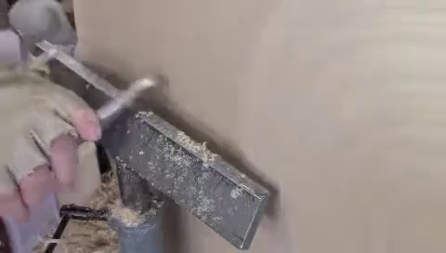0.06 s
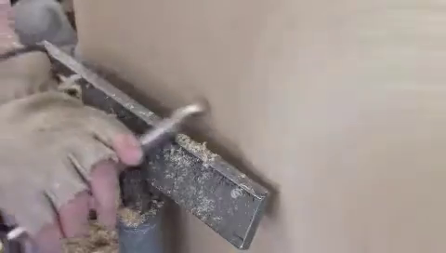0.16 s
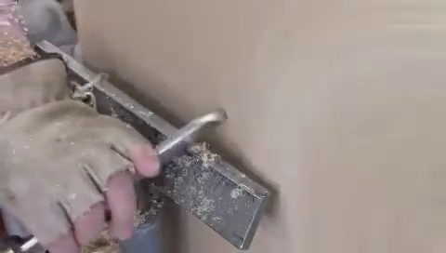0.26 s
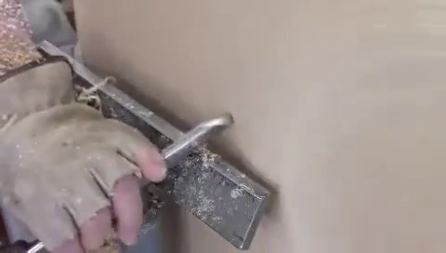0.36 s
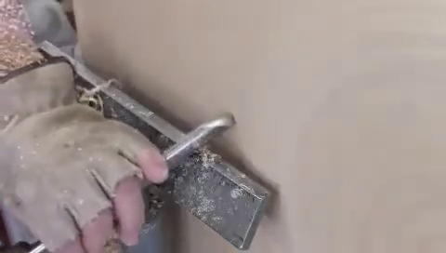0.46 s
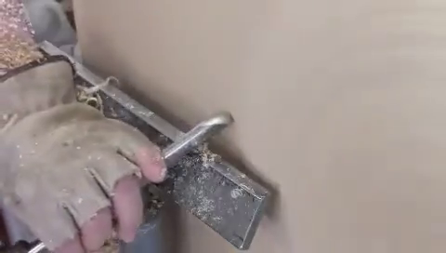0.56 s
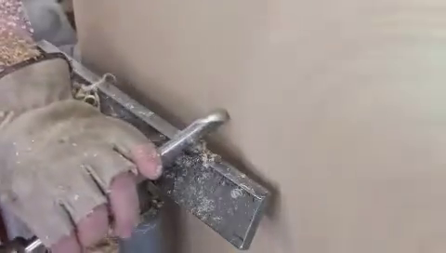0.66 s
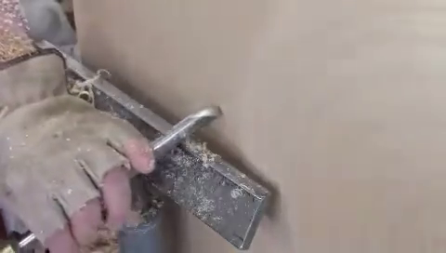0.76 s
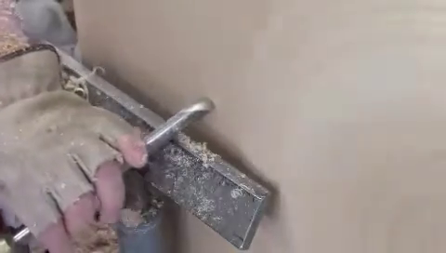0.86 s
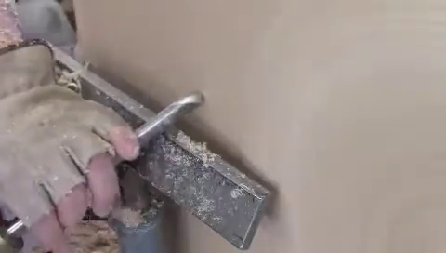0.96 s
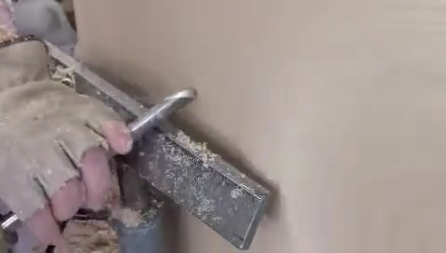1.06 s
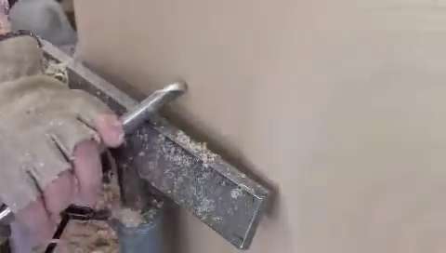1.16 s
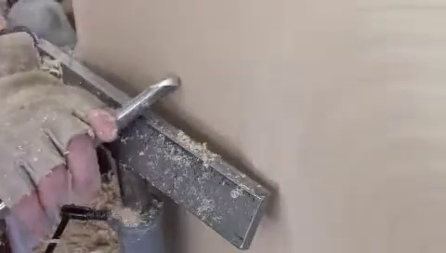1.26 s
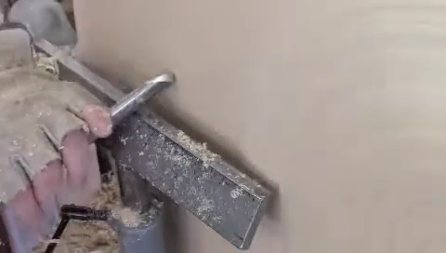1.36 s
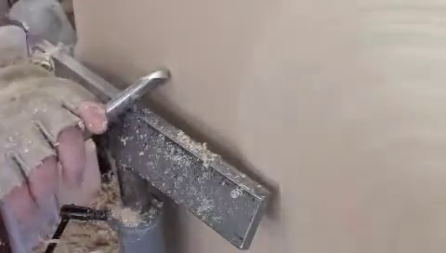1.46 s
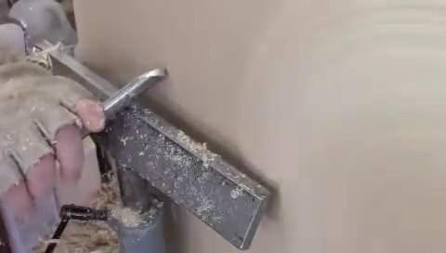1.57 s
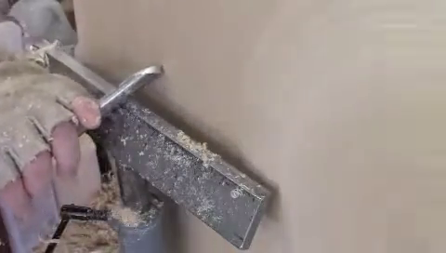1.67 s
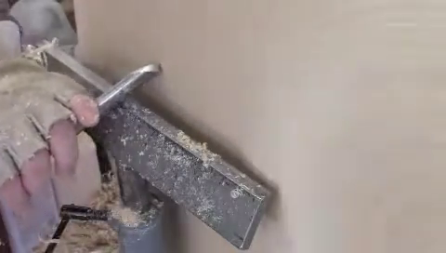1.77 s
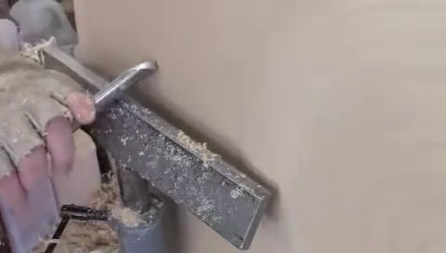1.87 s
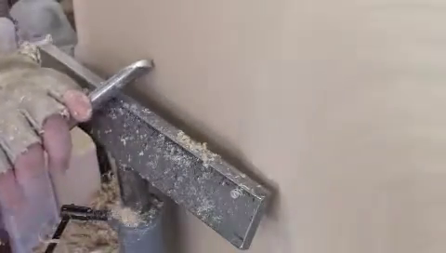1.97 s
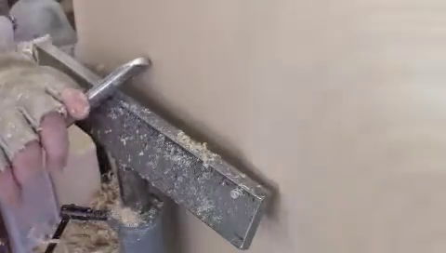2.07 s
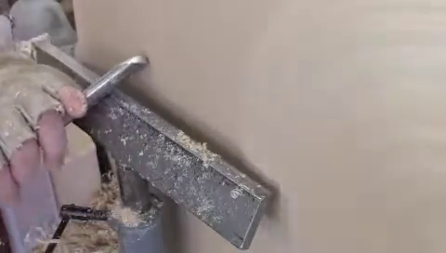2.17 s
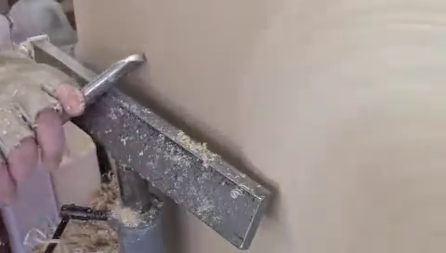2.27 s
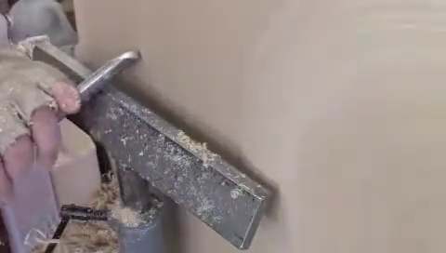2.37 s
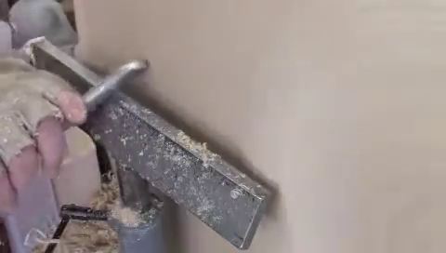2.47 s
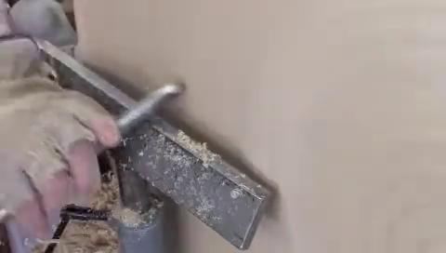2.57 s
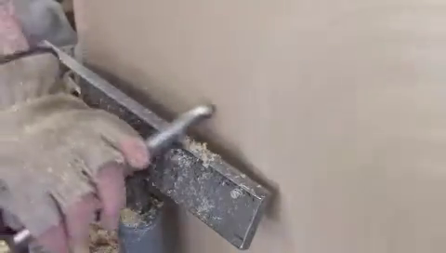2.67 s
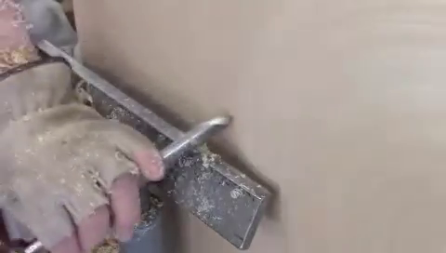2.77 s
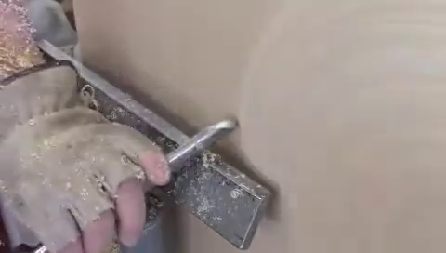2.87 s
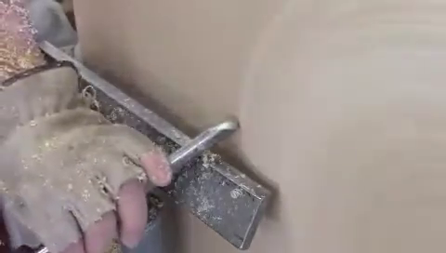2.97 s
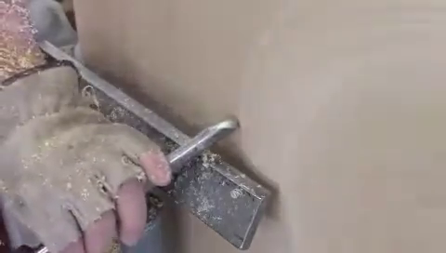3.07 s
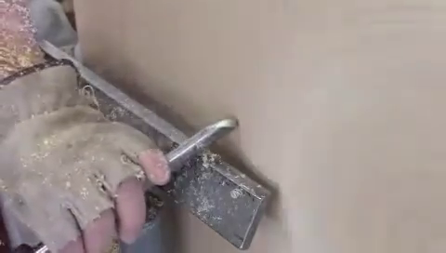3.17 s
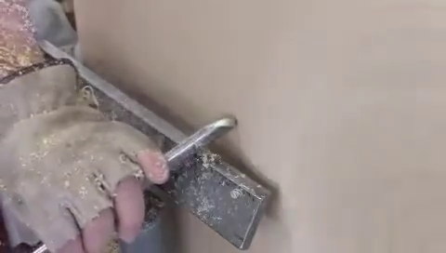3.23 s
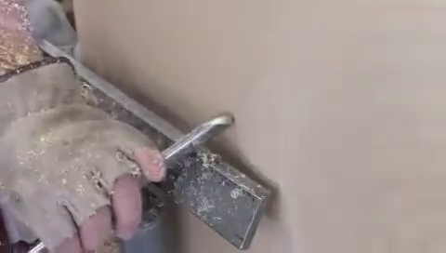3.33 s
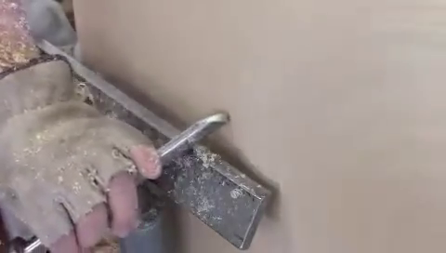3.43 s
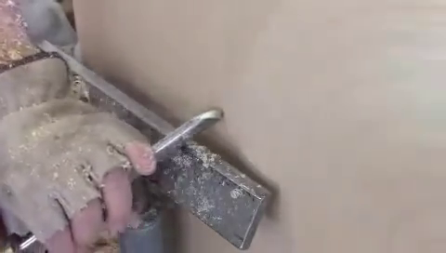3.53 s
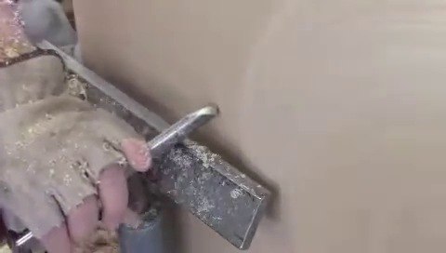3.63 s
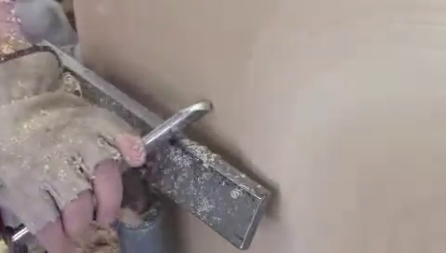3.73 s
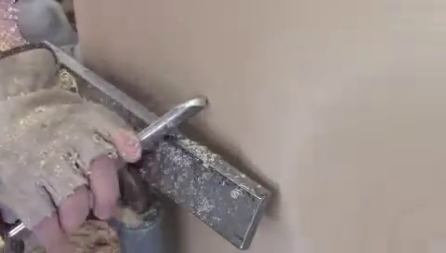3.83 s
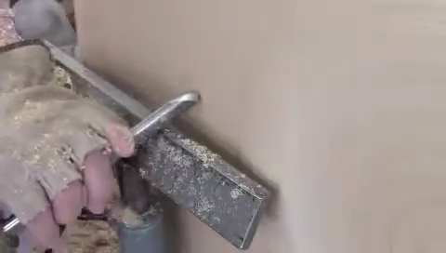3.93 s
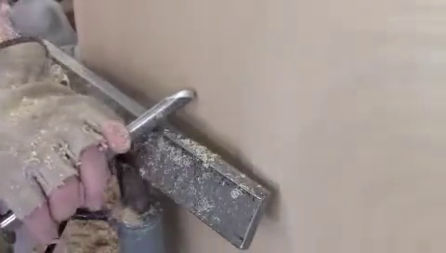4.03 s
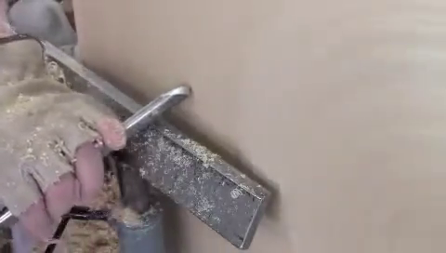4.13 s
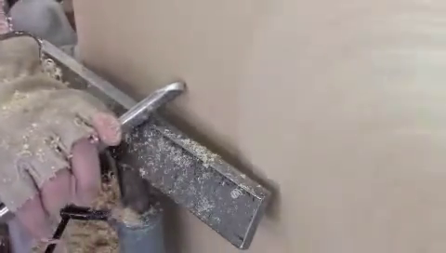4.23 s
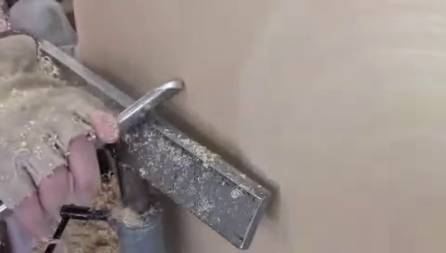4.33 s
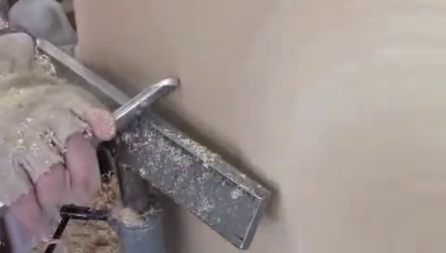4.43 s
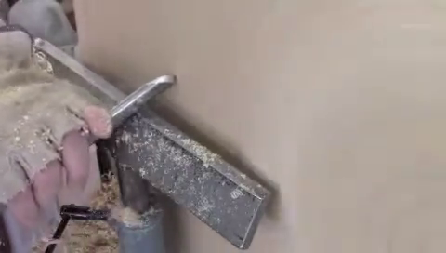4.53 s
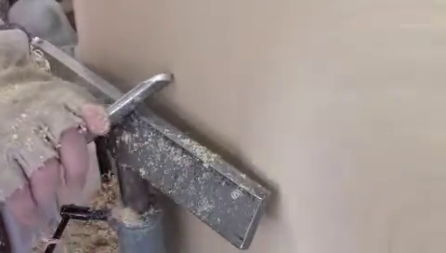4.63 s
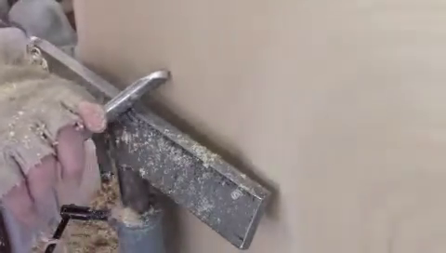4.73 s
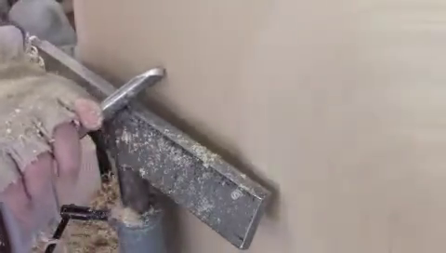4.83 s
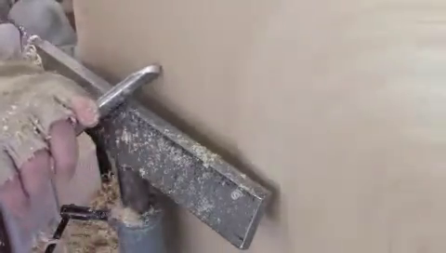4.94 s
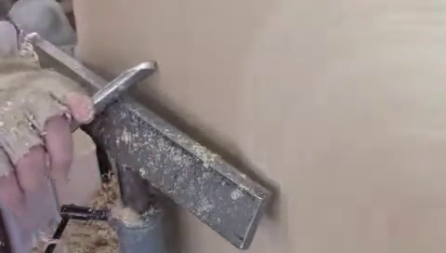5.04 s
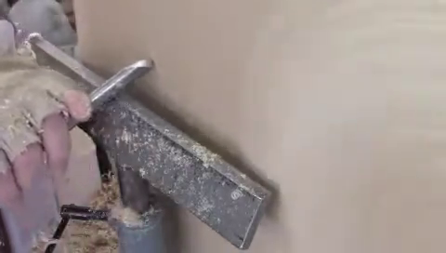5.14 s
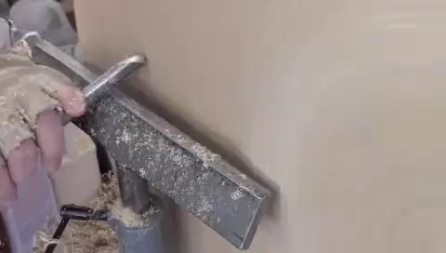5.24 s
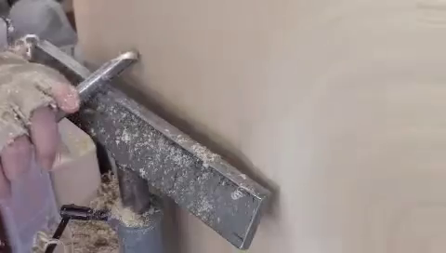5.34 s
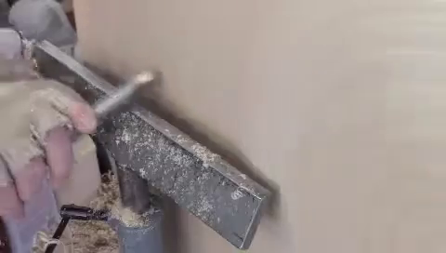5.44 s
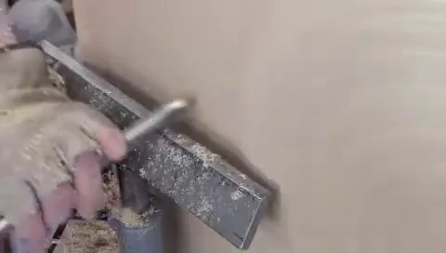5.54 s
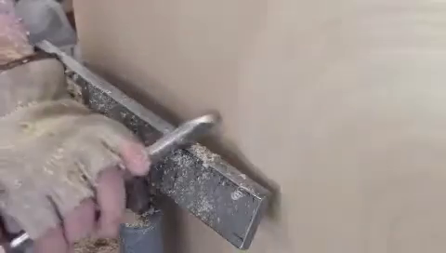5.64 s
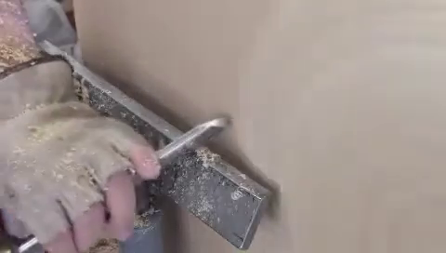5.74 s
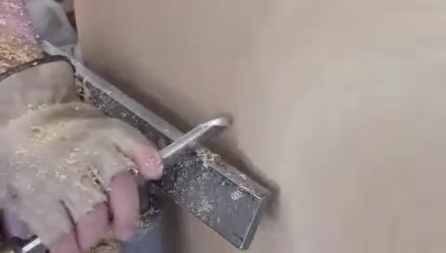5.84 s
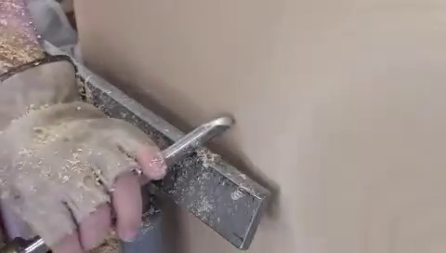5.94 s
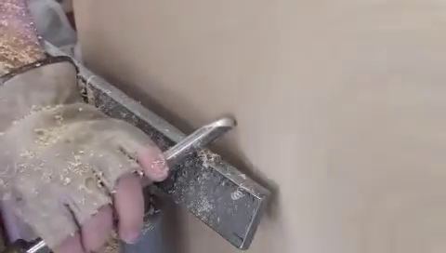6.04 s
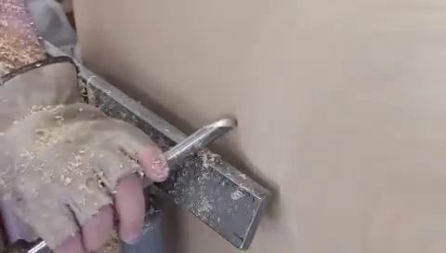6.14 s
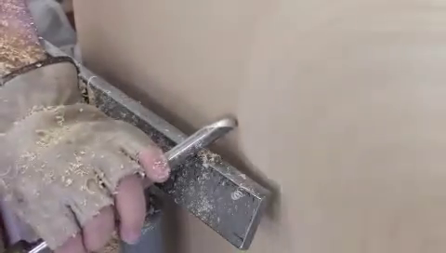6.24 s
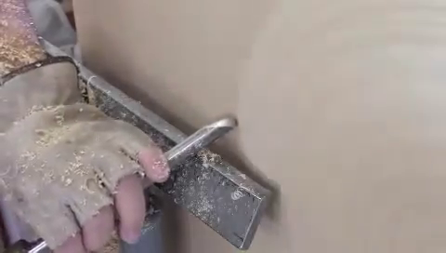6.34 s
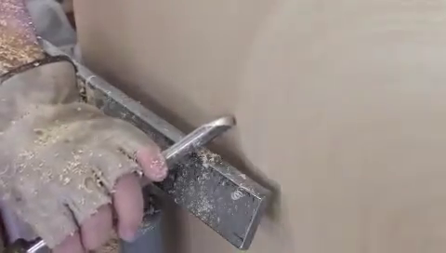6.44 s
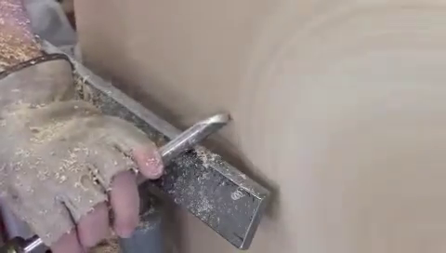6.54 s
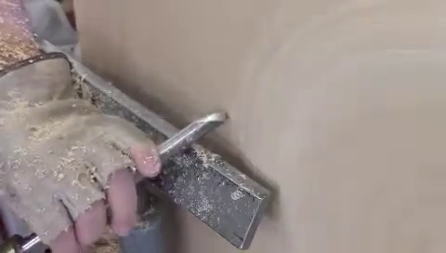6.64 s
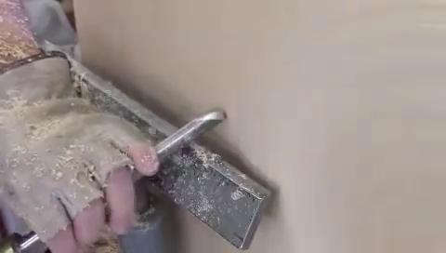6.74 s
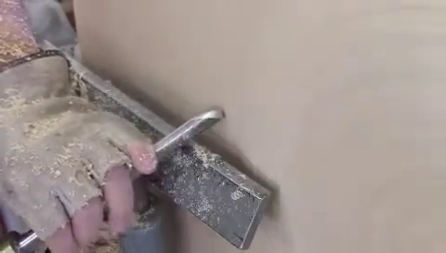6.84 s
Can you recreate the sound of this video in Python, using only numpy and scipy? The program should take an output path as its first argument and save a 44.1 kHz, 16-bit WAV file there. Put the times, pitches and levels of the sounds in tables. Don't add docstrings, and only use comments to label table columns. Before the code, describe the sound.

A close, thin-sounding microphone in a small workshop. At 0 s a cut is just ending; quiet airy lathe noise and faint motor hum remain, with a slight steel scrape and a small knock near 0.2 s. From 0.3 s light dull touches patter, and by 0.6 s the gouge bites: a buzzing, reedy drone of several hundred hertz up to nearly two kilohertz, rippling about sixteen times a second, with tearing hiss and end-grain ticks about thirty times a second. It grows harsher from 1.3 s and stops near 2.5 s. After a brief scrape, the second pass enters around 2.7 s, louder and rougher from 3.3 s with hard crackling digs, ending at 5.4 s. A thin steel slide and quiet hum follow. Near 5.7 s the bevel rubs again; uneven touches from 5.95 s lead to a strong, rasping cut from 6.45 s that continues to the end, about 7 s.

```python
import sys
import numpy as np
from scipy import signal
from scipy.fft import rfft, irfft
from scipy.io import wavfile
from scipy.ndimage import uniform_filter1d

SR = 44100
rng = np.random.default_rng(int(sys.argv[2]) if len(sys.argv) > 2 else 0)


def log_audio(samples):
    frames = np.atleast_2d(samples).T
    limited = np.clip(frames, -1, 1)
    pcm = np.round(limited * 32767).astype(np.int16)
    wavfile.write(sys.argv[1], SR, pcm)


def undo_db(level):
    steps = np.asarray(level, float) / 20
    return 10 ** steps


N = 304290
T = np.arange(N) / SR

TURNS_PER_S = 15.69
SETTLE_S = 0.58
FIFTH_DB = -9
# t/s, lead over steady speed/turns
SPINDLE_LEAD = [(0, .004), (.45, .0225), (.8, .0103), (1.5, -.0056), (2, -.0028), (2.95, .0277),
                (3.3, .0188), (4.9, .0202), (5.3, .0247), (5.9, .0526), (6.2, .0555), (6.9, .048)]
# t/s, tearing level/dB, usual end-grain catch level/dB
CUT_DEPTH = [(0, -38.5, -24), (.59, -36.5, -33), (.9, -35, -24), (1.35, -28.5, -15), (2.1, -26.5, -10),
             (2.2, -33.5, -20), (2.47, -33, -19), (2.7, -42.5, -21), (3.05, -34, -26), (3.3, -23, -12),
             (3.6, -29, -12.5), (4.4, -25, -15), (5.2, -31, -8), (5.36, -35.5, -21), (5.96, -32.5, -25),
             (6.26, -49, -22), (6.45, -28.5, -17), (6.9, -24, -12)]


def evened(x):
    return x / np.sqrt(np.mean(x ** 2) + 1e-20)


def curve(rows):
    s, *columns = np.transpose(rows)
    return [np.interp(T, s, c) for c in columns]


def coloured(x, points):
    f, db = np.transpose(points)
    hz = np.fft.rfftfreq(len(x), 1 / SR)
    gain_db = np.interp(np.log(hz + 1), np.log(f), db)
    return irfft(rfft(x) * undo_db(gain_db), len(x))


def resonated(x, peaks):
    hz = np.fft.rfftfreq(len(x), 1 / SR)
    response = sum(undo_db(db) / (1 + 2j * (hz - f) / w) ** 2 for f, w, db in peaks)
    return irfft(rfft(x) * response, len(x))


def drift(hz):
    knots = rng.standard_normal(int(N / SR * 40) + 2)
    smooth = signal.lfilter([1], [1, -np.exp(-2 * np.pi * hz / 40)], knots)
    return evened(np.interp(T * 40, np.arange(len(knots)), smooth))


def hand():
    # bevel lands t/s, edge first bites t/s, bevel lifts t/s
    passes = [
        (-5, -2.5, .04),
        (0.3036, .29, 2.515),
        (2.715, 2.5, 5.4),
        (5.67, 6, 7.5),
    ]
    land, bite, lift = np.transpose(passes)[:, :, None]
    landing_db = -32.5 * np.exp(np.minimum((land - T) / 0.058, 1))
    lifting_db = -150 * np.maximum(T - lift, 0)
    loss_db = np.minimum(landing_db, lifting_db)
    current = np.searchsorted(land[:, 0], T) - 1
    return loss_db.max(0), T - bite[current, 0]


def shop():
    # f/Hz, level per Hz/dB
    air_colour = [(35, -72), (60, -42), (81, -20), (185, -5.5), (521, 5), (3340, -3.5), (4980, -8.5),
                  (6450, -22), (6920, -10.5), (15400, -29), (16500, -43)]
    air = undo_db(-47) * evened(coloured(rng.standard_normal(N), air_colour))
    hum = evened(resonated(rng.standard_normal(N), [(92.7, 16, 0), (130, 80, -14)]))
    loss_db, since = hand()
    load_db = loss_db - 30 * np.clip(1 - since / SETTLE_S / 1.9, 0, 1)
    hum_db = -78 + 0.43 * load_db + 2.5 * drift(1.1) + 34.5
    return air + hum * undo_db(hum_db)


def around(rows, turns):
    once, at1, twice, at2 = np.transpose(rows)[:, :, None]
    return once * np.cos(2 * np.pi * (turns - at1)) + twice * np.cos(2 * 2 * np.pi * (turns - at2))


def bevel():
    # t/s, bevel pressure/dB, lean toward the low partials/dB
    pressure = [(0, -30, -0.5), (.43, -30.5, -7), (.8, -31.5, 1), (1.6, -25, -9), (2.12, -25.5, -10.5),
                (2.25, -28.5, -2), (2.86, -26, -2.5), (3.33, -21.5, -.5), (3.6, -25.5, -0.5),
                (4.4, -22.5, -5.5), (4.62, -24, -3.5), (4.72, -26.5, -6.5), (5.37, -27, -2.5),
                (5.84, -25, -4.5), (6.02, -21, -5.5), (6.26, -25.5, -10), (6.5, -18, -0.5),
                (6.9, -18.5, -1.5)]
    ridges = np.array([[23], [49], [73], [96], [119], [101]])
    # level over the pressure/dB, share of the lean, level gained on the inner ridges/dB,
    # share of the lean there, share of the loss at landing and lifting
    partials = [(-0.3, 1.06, 0.24, 0.97, 1.26), (-4.5, 0.5, 2.5, 0.33, 2.2), (-6, 0.5, 2.5, -0.24, 1.6),
                (-2.5, 0, 0.45, 0, 1.05), (FIFTH_DB - 2, 0, -0.59, 0, 0.77), (-11, -0.5, -2, 0, 0.9)]
    # once a turn/dB, at/turn, twice a turn/dB, at/turn
    outer_swell = [(2.2, 0.67, 1.7, 0.15), (1.2, 0.61, 2.3, 0.36), (2.8, 0.71, 5.3, 0.2),
                   (3.8, 0.53, 1.0, 0.2), (1.1, 0.74, 5.3, 0.35), (3.6, 0.46, 4.2, 0.19)]
    inner_swell = [(1.6, 0.96, 1.1, 0.12), (2.7, 0.7, 2.6, 0.29), (5.6, 0.4, 1.1, 0.2),
                   (3.6, 0.51, 0.4, 0.43), (2.8, 0.59, 3.4, 0.3), (3.2, 0.34, 3.1, 0.2)]
    outer_early = [(0.08, 0.14, 0.02, 0.1), (0.02, 0.01, 0.07, 0.21), (0.11, 0.39, 0.0, 0.38),
                   (0.14, 0.48, 0.1, 0.45), (0.03, 0.03, 0.05, 0.46), (0.17, 0.12, 0.05, 0.37)]
    inner_early = [(0.03, 0.15, 0.01, 0.39), (0.03, 0.83, 0.09, 0.22), (0.14, 0.04, 0.06, 0.43),
                   (0.16, 0.51, 0.1, 0.44), (0.06, 0.02, 0.04, 0.49), (0.16, 0.06, 0.1, 0.39)]
    # f/Hz, width/Hz, level/dB
    body = [(319.7, 52, -7), (527, 74, -1.5), (762, 59, 0), (929, 13, -14.5), (1105, 20, -26),
            (1158, 55, 2), (1434, 170, -5.5), (1547, 167, 2), (1905, 123, -2.5), (2259, 196, -5),
            (2582, 190, -9)]
    ripple_waves = np.array([16, 32, 34, 59, 68])
    ripple_levels = [-26, -18, -22.5, -22, -18.5]

    turns = TURNS_PER_S * T + curve(SPINDLE_LEAD)[0]
    loss_db, since = hand()
    inward = np.clip((since - SETTLE_S) / 0.41, 0, 1)
    outer_db, inner_swell_db = around(outer_swell, turns), around(inner_swell, turns)
    swell_db = outer_db + inward * (inner_swell_db - outer_db)
    outer_lead, inner_lead = around(outer_early, turns), around(inner_early, turns)
    ridge_lead = outer_lead + inward * (inner_lead - outer_lead)

    push_db, lean_db = curve(pressure)
    over_db, leans, inner_db, inner_leans, loses = np.transpose(partials)[:, :, None]
    level_db = push_db + over_db + (leans + inward * (inner_leans - leans)) * lean_db
    level_db = level_db + inner_db * inward + np.maximum(loses * loss_db, -37)

    waver = np.array([drift(3.5) for _ in ridges[1:]]) * np.array([[.2], [.5], [.8], [1.1], [1.3]])
    with_own = [0, 1, 2, 3, 4, 3]
    phase = ridges * turns + ridge_lead + 0.01 * waver[::-1][with_own] * ridges / 73
    phase[-1] += .53
    tone_db = level_db + 1.06 * swell_db + 1.3 * waver[with_own]
    tone = np.sqrt(2) * undo_db(tone_db) * np.cos(2 * np.pi * phase)

    per_turn = 2810
    renewed = .2
    fresh = rng.standard_normal((int(turns[-1]) + 22, per_turn))
    surface = signal.lfilter([1], [1, renewed - 1], fresh, axis=0)[20:].ravel()
    grain = resonated(np.interp(turns * per_turn, np.arange(len(surface)), surface), body)
    grain = evened(grain) * undo_db(-2 + .65 * swell_db[3])

    ripples = np.zeros(N)
    for waves, db in zip(ripple_waves, ripple_levels):
        ripples += undo_db(db + 3.25 * drift(3.6)) * np.cos(2 * np.pi * (waves * turns + rng.random()))

    bulge = np.exp(0.76 * (np.cos(2 * np.pi * (turns - .42)) - 1))
    puffs = evened(resonated(rng.standard_normal(N), [(4160, 2100, 0)])) * bulge * undo_db(-17.5)
    whistle = evened(resonated(rng.standard_normal(N), [(11850, 600, 0)])) * undo_db(-31)

    rub_db = 0.29 * level_db[0] + 0.62 * (push_db + loss_db)
    return tone.sum(0) + (grain + ripples * undo_db(0.5) + puffs + whistle) * undo_db(rub_db)


def engaged():
    # enters t/s, leaves t/s, faint brushing afterwards level/dB
    stays = [
        (-1, 0.0087, -69),
        (0.56, 2.475, -60),
        (2.67, 5.365, -60.5),
        (6, 5.995, -51.5),
        (6, 7.5, -60),
    ]
    enter, leave, idle_db = np.transpose(stays)[:, :, None]
    entering, staying = (T - enter) / 0.035, 1 - (T - leave) / 0.042
    share = np.clip(np.minimum(entering, staying), 0, 1).max(0)
    return share, idle_db[np.searchsorted(leave[:, 0], T) - 1, 0]


def catches():
    # t/s, peak
    # level/dB, length/ms
    single_catches = [(.001, -24, 5.9), (.2882, -25, 6.8), (.3182, -25, 7.3), (.3486, -32, 7.6), (.376, -32, 9),
                      (.4484, -30.5, 9), (.48, -32, 7.7), (.508, -38, 7.3), (.6325, -22, 5.5), (.8849, -17, 5),
                      (.9083, -13, 4.9), (1.0046, -15, 2.3), (1.1363, -10, 3), (2.68, -21, 7.9),
                      (2.7064, -24, 8.5), (2.7396, -21.5, 7.6), (2.798, -19, 6.1), (2.8624, -17, 6.6),
                      (5.637, -45, 3), (5.949, -14.5, 7.2), (5.9812, -14, 7.3), (6.025, -28, 7.4),
                      (6.2391, -17, 8.2), (6.277, -22, 6.7), (6.303, -16.5, 9.1), (6.3384, -18, 10.6),
                      (6.3693, -19, 10), (6.4022, -15.5, 11), (6.4895, -14, 13), (6.7105, -7, 6.7),
                      (1.3593, -4, 3.8), (1.4232, -2, 4.3), (1.5434, -5.5, 2.2), (1.577, -4, 2.3), (1.7664, -5, 3),
            (1.861, -5, 4), (2.0223, -2.5, 1.8), (2.0547, -6, 2.5), (2.088, 1.5, 1.1), (2.4417, -10.5, 2.2),
            (3.3338, -4.5, 4.9), (3.3625, -2, 5.2), (3.3947, 1, 4.3), (3.5224, -1.5, 4.7),
            (3.5856, -1.5, 4.2), (3.6494, -4, 3.6), (3.712, -4.5, 4.7), (3.8731, -5, 3.7), (3.904, 0, 3.2),
            (4.0961, -1, 2.1), (4.128, -2, 1.3), (4.3749, 3, 4.4), (4.4178, -4.5, 5.2), (4.575, -3.5, 5.4),
            (4.7355, -4, 2.5), (5.0856, -2.5, 1.2), (5.118, -3.5, 1.1), (5.271, -.5, 1.6),
            (6.5544, -4.5, 4.8), (6.5938, -6.5, 7.5)]
    half = np.arange(int(2 * TURNS_PER_S * T[-1]))
    luck = rng.standard_normal((len(half), 3))
    s = half / 2 / TURNS_PER_S
    narrow = np.clip(2 * np.interp(s, T, hand()[1]) / SETTLE_S - 1, 0, 1)
    at_turn = .46 + narrow * (.29 - .46) - np.interp(s, T, curve(SPINDLE_LEAD)[0])
    s = s + at_turn / TURNS_PER_S + 0.0033 * luck[:, 0]
    far_side_db = -6 * (1 - narrow) * (half % 2 == 0)
    db = np.interp(s, T, curve(CUT_DEPTH)[1]) + 5.5 * np.minimum(luck[:, 1], .7) + far_side_db
    ms = (8.1 + narrow * (2.9 - 8.1)) * np.exp(0.33 * luck[:, 2])
    placed = np.array(single_catches)
    clear = abs(s[:, None] - placed[:, 0]).min(1) > .016
    free = clear & (np.interp(s, T, engaged()[0]) == 1)
    return np.vstack([placed, np.transpose([s, db, ms])[free]])


def edge():
    # f/Hz, level per Hz/dB
    tear_colour = [(710, -27), (1200, -5), (1310, -5.5), (1530, -9), (1700, -20), (1860, -28),
                   (1990, -16.5), (2890, -12.5), (6290, -11.5), (8830, -15.5), (14600, -18), (16000, -19),
                   (16500, -71)]
    snaps = rng.standard_normal(N) * undo_db(1.6 * np.minimum(rng.exponential(1, N), 5))
    tear = coloured(snaps, tear_colour)
    tear = tear + resonated(tear, [(4140, 560, -14), (6410, 1650, -11.5)]) * undo_db(4.5 * drift(6.2))
    tear /= np.std(coloured(tear, [(4400, -80), (4500, 0), (15000, 0), (15100, -80)]))
    bright = coloured(tear, [(3000, -20.5), (15000, 6.5)])

    swells = np.zeros((2, N + 4000))
    for s, peak_db, ms in catches():
        ms = np.clip(ms, 1, 14)
        u = np.arange(4000) / SR / ((ms + 1.2) / 1000)
        sharp = np.clip(1.3 - 0.13 * ms, 0, 1)
        burst = np.exp(-2.5 * (u - .7) ** 2 * np.where(u < .7, 3.0, 1))
        trail = 0.18 * np.minimum(u, 1) * np.exp(-u / 4)
        swell = undo_db(peak_db - 7.5) * (burst + trail)
        at = max(int((s - .0012 - 0.00048 * max(ms - 3, 0)) * SR), 0)
        swells[:, at:at + 4000] += np.outer([1 - sharp, sharp], swell)

    share, idle_db = engaged()
    flutter_db = 2.77 * evened(uniform_filter1d(rng.standard_normal(N), 300))
    steady = undo_db(idle_db + share * (curve(CUT_DEPTH)[0] - idle_db) + flutter_db)
    return tear * np.sqrt(steady ** 2 + swells[0, :N] ** 2) + bright * swells[1, :N]


def rest():
    # t/s, level/dB
    slides = [
        [(.1, -76), (.19, -68), (.26, -76)],
        [(2.5, -61), (2.6, -72), (2.67, -86)],
        [(5.465, -70), (5.48, -62), (5.56, -67), (5.7, -76)],
    ]
    # f/Hz, width/Hz, level/dB
    rest_modes = [(3400, 250, -3), (6270, 550, -5)]
    # t/s, peak level/dB
    knocks = [
        (0.188, -24.5),
    ]
    # f/Hz, level/dB, t60/s
    shank_modes = [(2240, -24, 0.16), (3820, -4, 0.062), (6060, -16, 0.091), (6400, 4, 0.036),
                   (7090, -19, 0.051)]
    scrape = evened(resonated(rng.standard_normal(N) * undo_db(rng.exponential(1, N)), rest_modes))
    level = sum(np.interp(T, s, undo_db(db + 13.5), 0, 0) for s, db in map(np.transpose, slides))
    u = np.arange(6000) / SR
    ring = sum(undo_db(db - 60 * u / t60) * np.sin(2 * np.pi * hz * u) for hz, db, t60 in shank_modes)
    ring = ring * np.minimum(u / 0.0013, 1)
    blows = np.zeros(N)
    for s, db in knocks:
        blows[int(s * SR)] = undo_db(db - 7.5)
    return scrape * level + signal.oaconvolve(blows, ring)[:N]


def walls(x):
    t60 = .16
    u = np.arange(SR // 2) / SR
    tail = rng.standard_normal((2, len(u))) * undo_db(-60 * u / t60) * (u > .004)
    side = np.convolve(tail[1], [1.5, -3.5, 3.5, -1], "same")
    tail = tail[0] + 0.084 * np.outer([1, -1], side)
    return signal.oaconvolve(x[None], tail / np.linalg.norm(tail[0]), axes=1)[:, :N]


def scene():
    rub = bevel()
    tool = edge() + rest()
    return shop() + rub + tool + walls(undo_db(-13) * tool + undo_db(-20) * rub)


def roll_off(x):
    return signal.sosfilt(signal.butter(12, 17000, fs=SR, output="sos"), x)


def record(dry):
    soft = np.tanh(dry / .9) * .9
    bass_cut = signal.butter(5, 235, "high", fs=SR, output="sos")
    thin = signal.sosfilt(bass_cut, soft) + undo_db(-26.5) * soft
    top_cut = signal.firwin(255, 15800, window=("kaiser", 8), fs=SR)
    return roll_off(signal.oaconvolve(thin, top_cut[None], "same"))


dry = scene()
out = record(dry)
log_audio(out)
```